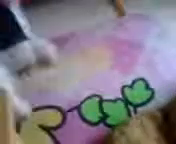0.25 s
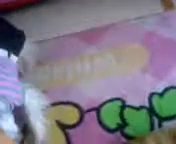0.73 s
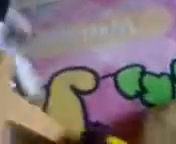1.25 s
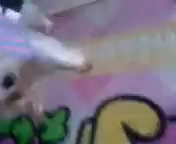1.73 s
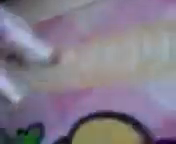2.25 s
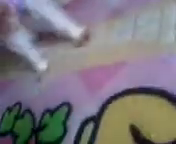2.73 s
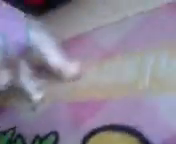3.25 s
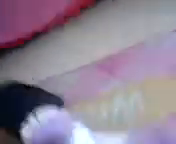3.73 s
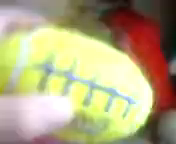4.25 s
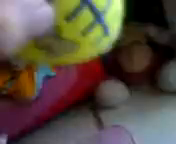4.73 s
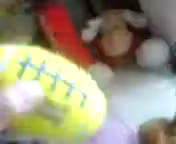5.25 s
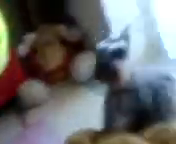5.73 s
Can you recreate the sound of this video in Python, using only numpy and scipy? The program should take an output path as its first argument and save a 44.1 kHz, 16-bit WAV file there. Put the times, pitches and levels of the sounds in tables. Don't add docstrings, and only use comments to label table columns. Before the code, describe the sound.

After a short knocking and scraping scuffle, a squeaky toy chirps once when bitten, then five loud hand-squeezed squeaks each sag into a lower wheeze.

```python
import sys
import numpy as np
from scipy import signal
from scipy.io import wavfile
from scipy.ndimage import uniform_filter1d

SR = 44100
rng = np.random.default_rng(int(sys.argv[2]) if len(sys.argv) > 2 else 0)


def transcribe(u):
    v = np.clip(np.atleast_2d(u).T, -1, 1)
    q = np.round(v * 32767).astype(np.int16)
    wavfile.write(sys.argv[1], SR, q)


def how_loud(loudness_db):
    steps = np.asarray(loudness_db, float) / 20
    return 10 ** steps


N = 264600
T = np.arange(N) / SR

# freq_hz, level_db (per Hz)
HISS_COLOUR = [(40, -13), (200, -10.5), (380, 0.5), (700, -2.5), (1150, -6), (1800, 9), (2500, 1.5),
               (3600, -1)]
# freq_hz, width_hz, level_db
ROOM_HUMS = [(360, 200, -17), (1120, 73, -11), (1630, 140, -14.5)]
# centre_s, half_width_s, level_db
FUR_STROKES = [
    (.1, 0.094, -54),
    (.46, 0.07, -43.5),
    (2.06, 0.14, -48),
    (2.82, 0.066, -37.5),
    (3.09, 0.073, -44.5),
    (4.12, 0.094, -48),
]
# start_s, peak_db, ring_hz
PAW_PATS = [(0.026, -28.5, 342), (0.102, -36, 1730), (0.2, -35, 1680), (0.369, -27, 290), (0.4, -32, 1840),
            (0.481, -28, 1460), (0.695, -32.5, 1120), (1.561, -34, 1130), (1.737, -35, 380),
            (1.934, -17, 1920), (1.944, -30.5, 590), (2.035, -23, 2220), (2.063, -25, 2010),
            (2.211, -29.5, 720), (2.273, -15.5, 1270), (2.281, -12, 880), (2.64, -34, 420),
            (2.757, -26.5, 420), (2.845, -27, 1950), (5.864, -24.5, 1395)]
# freq_hz, width_hz, level_db
HOLLOW_BODY = [(717, 122, -1), (1270, 130, 5), (1800, 57, 0.5), (2252, 49, 6.5), (2620, 11, -13),
               (2930, 140, -6), (3480, 38, 2.5)]
# start_s, peak_db, ring_hz
KNOCKS = [(0.951, -5, 990), (0.954, -7.5, 840), (1.019, -2.5, 930), (1.023, -5, 1150), (1.033, -7, 1190),
          (1.059, -5.5, 600), (1.075, 9.5, 2005), (1.117, 2.5, 2345), (1.14, -10, 2090), (1.185, 5.5, 1875),
          (1.203, 11, 2048), (1.246, -5, 1910), (1.254, -8.5, 2360), (1.264, -13, 2020), (1.29, -5.5, 1760),
          (1.298, -2.5, 1960), (1.322, -27, 1900)]
# start_s, attack_s, hold_s, level_db
DRAG_STROKES = [
    (0.999, 0.018, 0.038, -12.5),
    (1.052, .007, 0.092, -4),
    (1.182, .004, .025, -11),
    (1.241, .004, 0.01, -16),
    (1.289, 0.003, 0.0071, -15.5),
    (1.343, 0.035, 0.084, -43),
]
# time_s, pitch_hz, level_db, octave_db (re the tone)
BITE = [
    (2.378, 1399, -22.5, -7.5),
    (2.387, 1535, -16, -2.5),
    (2.4, 1560, -24, 4),
    (2.418, 1563, -10.5, -4.5),
    (2.44, 1561, -9.5, -4.5),
    (2.453, 1490, -9.5, -8.5),
    (2.463, 1410, -34, -2),
]
# time_s, pitch_hz, level_db, octave_db
BITE_REFILL = [
    (2.508, 1158, -24, -42),
    (2.52, 1376, -10.5, -11),
    (2.55, 1345, -13.5, -14),
    (2.576, 1304, -17.5, -13),
    (2.594, 1142, -23, -24),
    (2.603, 1100, -34, -63),
]
# start_s, rise_s, hold_s, fall_s, top_pitch_hz
SQUEEZES = [
    (3.508, 0.067, 0.018, 0.054, 2155),
    (4.171, 0.064, 0.0064, 0.073, 2095),
    (4.591, .056, .014, 0.072, 1844),
    (5.092, .052, .031, .059, 2129),
    (5.437, 0.042, 0.026, .048, 1824),
]
# start_s, length_s, top_pitch_hz, level_db, octave_db
REFILLS = [
    (3.684, 0.22, 1477, -8, -15),
    (4.346, .201, 1462, -6, -22.5),
    (4.77, .231, 1444, -6.5, -13.5),
    (5.279, .138, 1472, -5, -19.5),
    (5.576, 0.27, 1464, -8.5, -19),
]
# time_s, gain_db
HAND_AIM = [(3.53, -1), (3.6, -1), (3.73, 1), (3.81, -2), (3.87, 1.5), (4.2, 1.5), (4.37, 1), (4.43, 0),
            (4.52, 4), (4.6, -1.5), (4.66, 1.5), (4.8, -1), (4.97, -0.5), (5.1, 2), (5.35, -2.5), (5.4, -1),
            (5.5, -4), (5.69, 1.5)]


def level(x, db):
    return x * how_loud(db) / np.sqrt(np.mean(x ** 2))


def band(x, hz, width_hz):
    return signal.lfilter(*signal.iirpeak(hz, hz / width_hz, SR), x)


def walk(rate):
    k = int(SR / rate)
    steps = np.repeat(rng.standard_normal(N // k + 1), k)
    return uniform_filter1d(uniform_filter1d(steps, k), k)[:N]


def room_hiss(crackle):
    hiss = 0
    hz, db = np.transpose(HISS_COLOUR)
    for centre in 40 * 2 ** np.arange(0, 6.7, 1 / 3):
        tilt_db = np.interp(np.log(centre), np.log(hz), db)
        noise = band(crackle * rng.standard_normal(N), centre, centre / 5)
        hiss = hiss + how_loud(tilt_db + 4.3 * walk(13)) * noise
    hiss = level(hiss, 0)
    for centre, width, hum_db in ROOM_HUMS:
        swell = how_loud(4.0 * walk(6))
        hiss = hiss + swell * level(band(rng.standard_normal(N), centre, width), hum_db)
    return level(hiss, -44.5)


def fur_rustle(crackle):
    fur_hz, width_hz = 2030, 1000
    fur = band(crackle * rng.standard_normal(N), fur_hz, width_hz)
    fur = band(fur, fur_hz, width_hz)
    strokes = sum(how_loud(db) * np.exp(-((T - s) / width) ** 2) for s, width, db in FUR_STROKES)
    return level(fur, 0) * strokes * how_loud(2.9 * walk(30))


def background():
    crackle = 1 + 1.7 * (rng.random(N) < 150 / SR) * rng.exponential(size=N)
    return room_hiss(crackle) + fur_rustle(crackle)


def body(x, damping):
    return sum((-1) ** k * how_loud(db) * band(x, hz, damping * width)
               for k, (hz, width, db) in enumerate(HOLLOW_BODY))


def hits(table, ring_s, crack_s, thud_hz, hollow):
    out, t = np.zeros(N + 4096), np.arange(4096) / SR
    for s, db, hz in table:
        thud_db = -5 - 18.5 * max(hz / 1e3 - 1, 0)
        burst = rng.standard_normal(len(t)) * np.exp(-t / crack_s)
        crack = band(burst, 1500, 3600) + hollow * body(burst, 2.3)
        ring = np.sin(2 * np.pi * hz * t) * t / ring_s * np.exp(-t / ring_s)
        thud = how_loud(thud_db) * np.sin(2 * np.pi * thud_hz * t) * t / 0.0055 * np.exp(-t / 0.0031)
        blow = crack + 1.85 * ring + 1.6 * thud
        out[int(s * SR):int(s * SR) + len(t)] += how_loud(db) * blow / np.abs(blow).max()
    return out[:N]


def drag():
    release_db_per_s = 599
    clicks = (rng.random(N) < 2500 / SR) * rng.standard_normal(N) * how_loud(2.12 * rng.exponential(size=N))
    rub = level(body(clicks, 2.7), 0) + level(band(clicks, 1700, 4800), -5.0)
    push = 0
    for s, attack, hold, db in DRAG_STROKES:
        fall_db = release_db_per_s * np.maximum(T - s - attack - hold, 0)
        push = push + np.clip((T - s) / attack, 0, 1) * how_loud(db - fall_db)
    return rub * push * how_loud(-3.5 + 4.2 * walk(90))


def bounces(count):
    first_gap_s, gap_shrink = .038, .78
    k = np.arange(count)
    s = 1.336 + first_gap_s * (1 - gap_shrink ** k) / (1 - gap_shrink)
    db = -3 - 1.3 * k - .2 * k ** 2
    return list(zip(s, db, 1790 + 0 * k))


def whistle(notes, push_db, breath_db, rise_s, octave_follows):
    out, wobble, jet = np.zeros(N), walk(150), walk(900)
    tone_flutter_db, octave_flutter_db = .8 * walk(45), 3.36 * walk(70)
    for note in notes:
        s, *columns = np.transpose(note)
        span = slice(int(s[0] * SR), int(s[-1] * SR))
        hz, db, octave_db = (np.interp(T[span], s, c) for c in columns)
        db = db + tone_flutter_db[span]
        octave_db = octave_db + octave_flutter_db[span]
        if octave_follows:
            octave_db = octave_db + db
        hz = uniform_filter1d(hz, int(.012 * SR), mode="nearest")
        phase = 2 * np.pi * np.cumsum(hz * (1 + 0.0024 * wobble[span])) / SR
        edge = np.clip(np.minimum((T[span] - s[0]) / rise_s, (s[-1] - T[span]) / 0.0023), 0, 1)
        tone = how_loud(db) * np.sin(phase) + how_loud(octave_db) * np.sin(2 * phase + 1.41)
        breath = 1 + how_loud(breath_db) * jet[span]
        out[span] = np.sqrt(2) * how_loud(push_db) * edge * breath * tone
    return out


def refill(start, length, top_hz, db, octave_db):
    t = np.arange(0, length, 1 / 500)
    eased = (t / length) ** 2.2
    gasp = np.exp((t - length) / .009)
    scoop_hz, sag_hz = 115.1 * np.exp(-t / .016), 720 * length * eased
    hz = top_hz - scoop_hz - sag_hz - 170 * gasp
    swell_db = 3.5 * np.exp(-t / 0.041)
    tone_db = db - swell_db - 41.5 * length * eased - 19 * gasp
    return np.transpose([start + t, hz, tone_db, octave_db - 6 * eased - 19 * gasp])


def squeeze(start, rise, hold, fall, top_hz):
    speaks_hz, dies_hz, overblow_hz = 1552, 1481, 1701
    times = start + np.cumsum([0, rise, hold, fall])
    s = np.arange(start, times[-1], 1 / 500)
    hz = np.interp(s, times, [speaks_hz, top_hz, top_hz, dies_hz])
    overblown = 1 / (1 + np.exp((overblow_hz - hz) / 20))
    db = -18.5 + 10.5 * (hz - speaks_hz) / 1e3 + 9 * overblown
    db = db - 6 * np.clip((s - times[2]) / fall, 0, 1) ** 2
    return np.transpose([s, hz, db, -0.5 - 12.5 * overblown])


def bitten_squeak():
    bite = whistle([BITE], 3.3, -18.5, 0.0047, octave_follows=True)
    return bite + whistle([BITE_REFILL], -1.0, -17.5, 0.0027, octave_follows=False)


def hand_squeaks():
    out = whistle([squeeze(*row) for row in SQUEEZES], 8.34, -13, 0.0094, octave_follows=True)
    out = out + whistle([refill(*row) for row in REFILLS], -1.3, -21.5, 0.0072, octave_follows=False)
    return out * how_loud(np.interp(T, *np.transpose(HAND_AIM)))


def room(x, wet_db):
    t60_s = 0.42
    t = np.arange(int(.8 * SR)) / SR
    tail = rng.standard_normal(len(t)) * how_loud(-60 * t / t60_s) * np.clip((t - .003) / 0.0031, 0, 1)
    return x + how_loud(wet_db) * signal.fftconvolve(x, tail / np.sqrt(np.sum(tail ** 2)))[:N]


def scene():
    pops = [(s + length - .004, -29.5, 1340) for s, length, *_ in REFILLS]
    floor = hits([*KNOCKS, *bounces(count=9)], .0015, 0.005, 450, 1.48)
    floor = floor + hits([*PAW_PATS, *pops], 0.0016, 0.0083, 330, 0.53) + drag()
    mix = background() + room(floor, wet_db=-14.5)
    mix = mix + room(bitten_squeak(), wet_db=-17.5) + room(hand_squeaks(), wet_db=-11)
    return mix[None]


def sieve(x, order, hz, kind, rate):
    return signal.sosfilt(signal.butter(order, hz, kind, fs=rate, output="sos"), x)


def slow_phone(x, slow_sr):
    x = signal.sosfilt(signal.ellip(8, .5, 50, 3380, fs=SR, output="sos"), x)
    slow = np.clip(signal.resample_poly(x, 80, 441), -.7, .7)
    slow = sieve(slow, 2, 160, "high", slow_sr)
    grit = np.diff(rng.standard_normal(len(slow) + 1))
    slow = slow + how_loud(-35) * uniform_filter1d(np.abs(slow), 24) * grit
    treble = sieve(slow, 5, [3200, 3480], "band", slow_sr)
    edge = sieve(rng.standard_normal(len(slow)), 8, 3400, "high", slow_sr)
    slow = slow + how_loud(2.5) * uniform_filter1d(np.abs(treble), 40) * edge
    rumble = sieve(rng.standard_normal(len(slow)), 1, 200, "low", slow_sr)
    return slow + level(rumble, -66)


def low_pass(x):
    return signal.sosfilt(signal.butter(12, 15810, fs=SR, output="sos"), x)


def record(dry):
    slow_sr = 8000
    x = signal.resample(slow_phone(dry[0], slow_sr), N)
    x = x * (1 + 2 * np.cos(2 * np.pi * slow_sr * T))
    x = sieve(x, 8, 3300, "low", SR)
    x = sieve(x, 14, 5050, "low", SR)
    x = np.clip(x * how_loud(-0.2466), -.71, .71)
    x = sieve(x, 2, 13000, "low", SR)
    x = x + how_loud(-95.5) * np.sin(2 * np.pi * 11025 * T)
    return low_pass(x[None])


dry = scene()
out = record(dry)
transcribe(out)
```